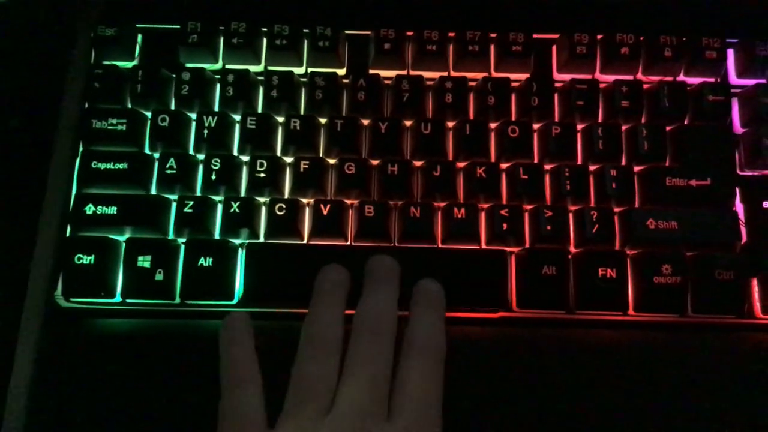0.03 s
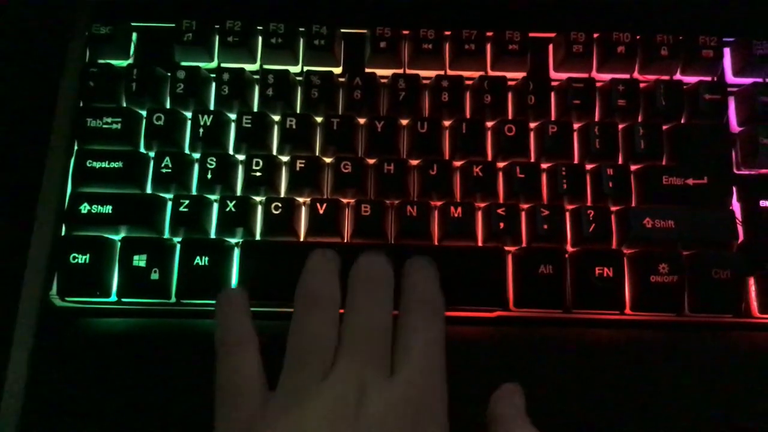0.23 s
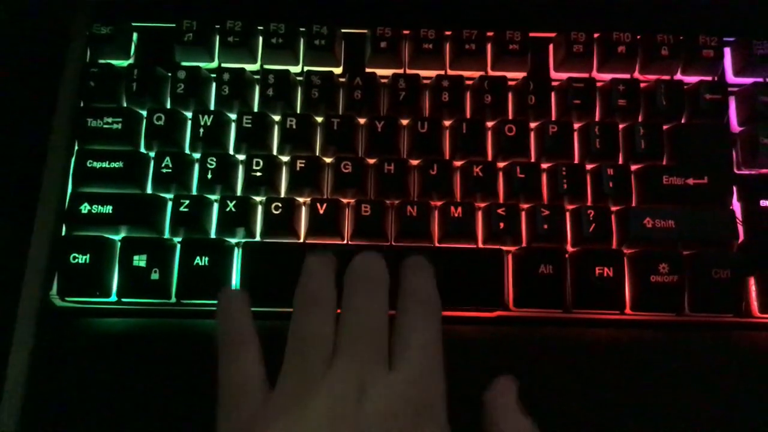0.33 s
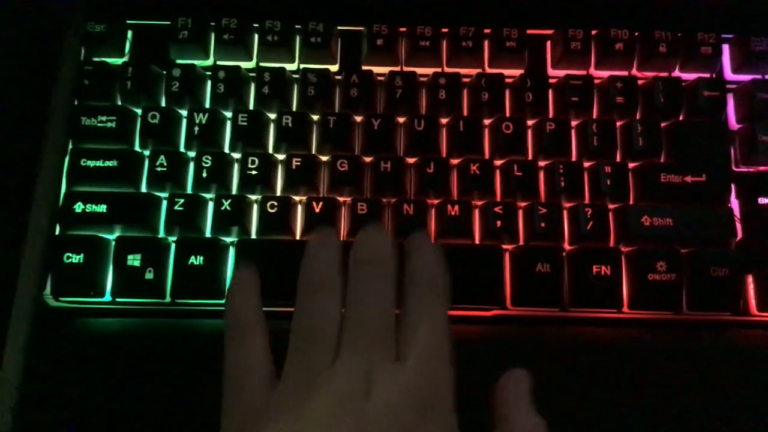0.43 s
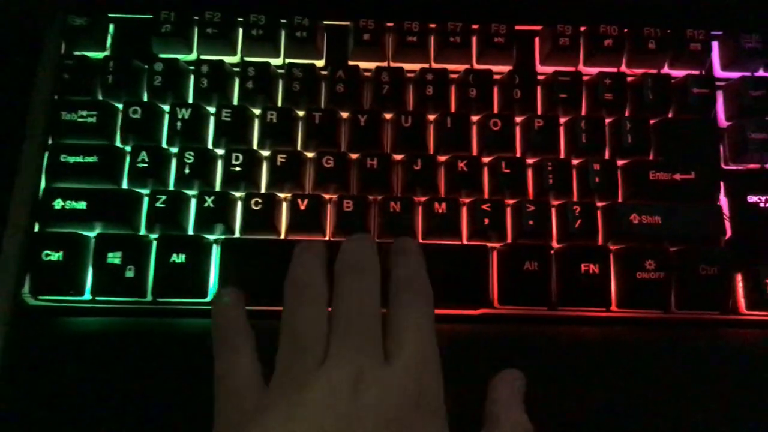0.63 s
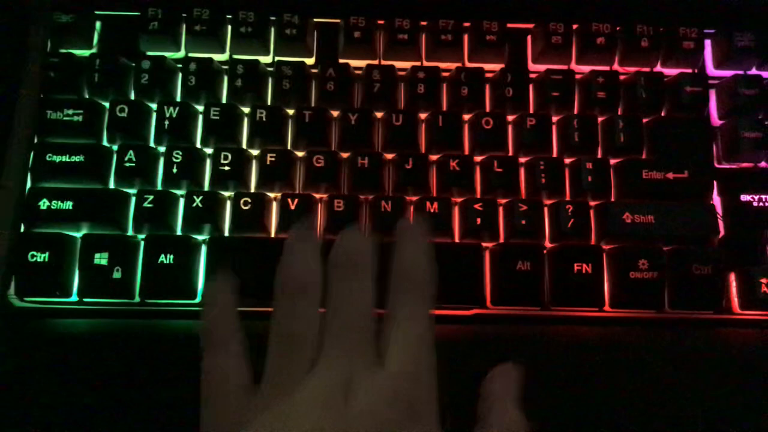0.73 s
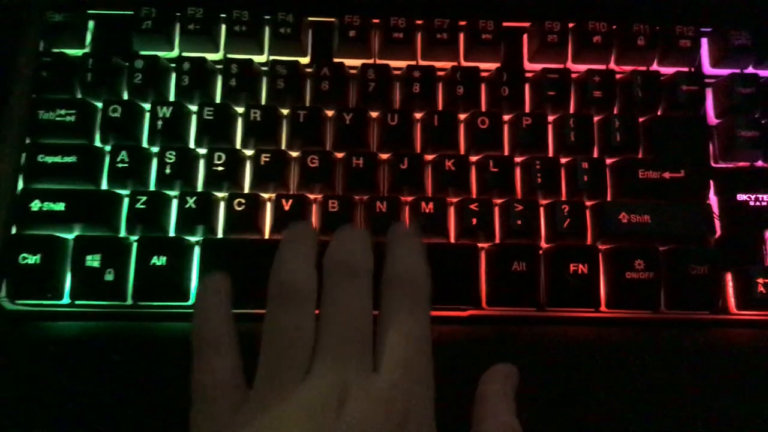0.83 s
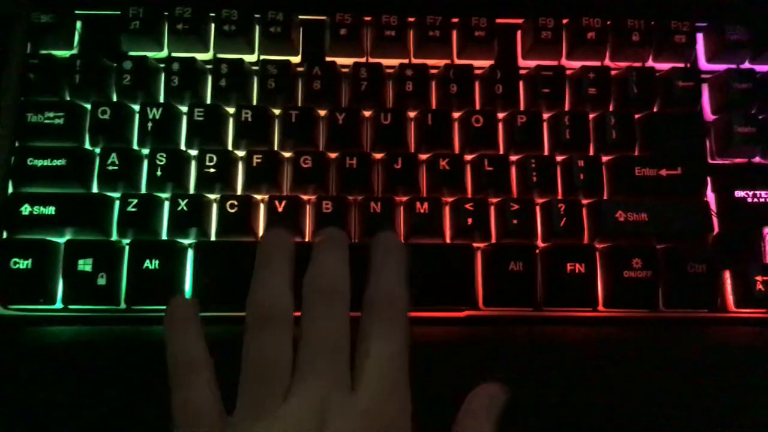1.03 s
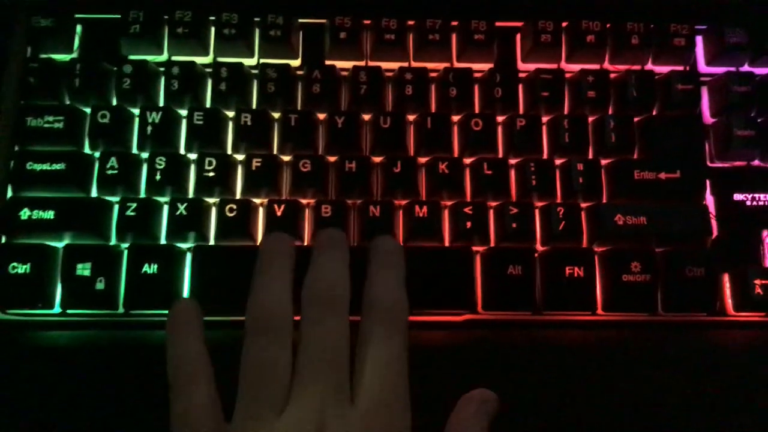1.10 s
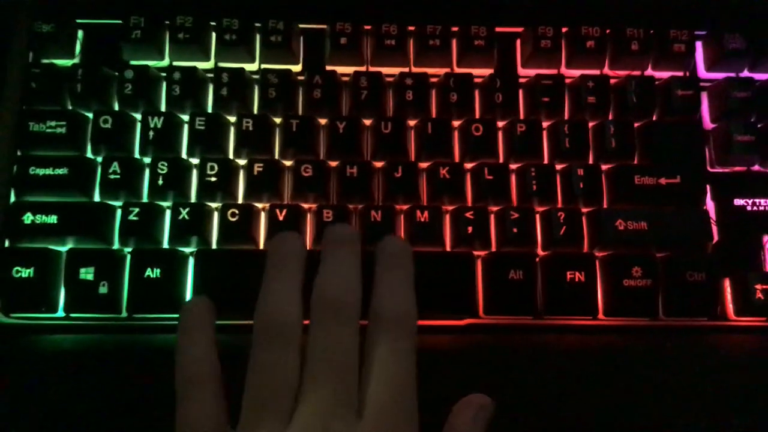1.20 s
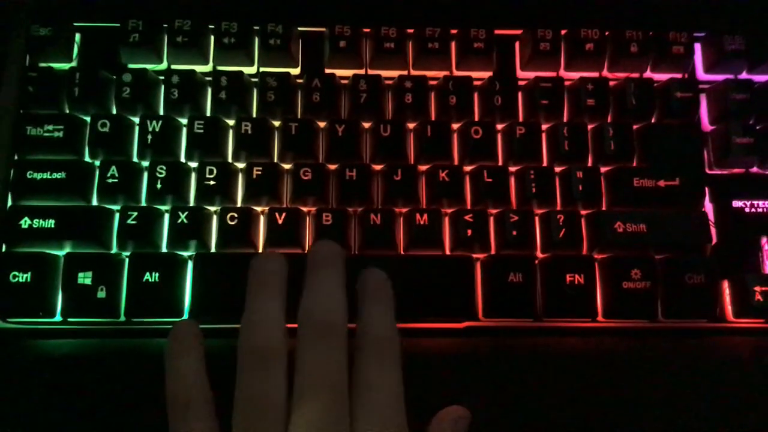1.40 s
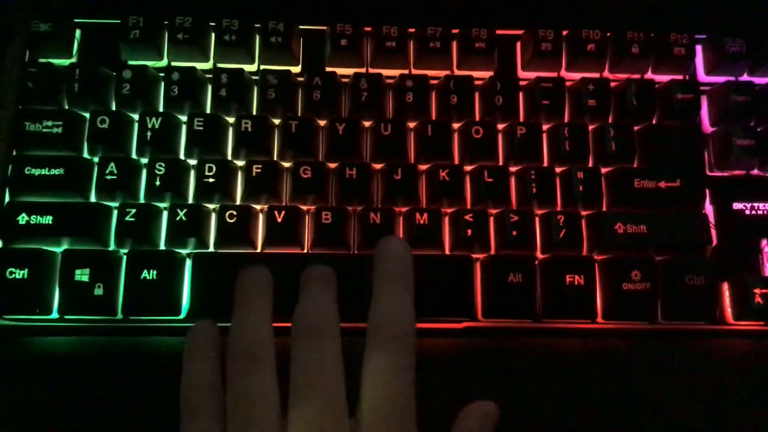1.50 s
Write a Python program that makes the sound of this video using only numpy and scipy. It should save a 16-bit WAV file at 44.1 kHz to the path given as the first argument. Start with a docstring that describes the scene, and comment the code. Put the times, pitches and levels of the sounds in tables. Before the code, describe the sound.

A keyboard space bar tapped about six times, giving sharp, rattling plastic clacks.

```python
"""Light fingernail ticks over a low fan hum lead into six taps of a plastic space bar on a desk.
Each press is an impact that excites damped modes: the keycap cracks, the case thumps, the bar rebounds.
On the way up the stabiliser wire rattles and the bar clacks against its top stop.
At the end the fingers settle on the bar. The small, quiet room adds a short diffuse tail."""
import sys
import numpy as np
from scipy import signal
from scipy.fft import rfft, irfft
from scipy.io import wavfile

SR = 44100
rng = np.random.default_rng(int(sys.argv[2]) if len(sys.argv) > 2 else 0)


def persist_wave(psi):
    """Save psi, clipped to +-1, as 16-bit WAV."""
    counts = np.round(np.clip(psi, -1, 1) * 32767).astype(np.int16)
    wavfile.write(sys.argv[1], SR, np.atleast_2d(counts).T)


N = 68355

# Fan noise and room air. Each row: frequency in Hz, relative spectral density in dB.
AIR_SPECTRUM = [(25, -111), (42, -25), (62, 3), (95, -4.5), (135, 2.5), (175, -4.5), (260, -6), (450, -13),
                (900, -23.5), (2000, -32.5), (5000, -38.5), (15000, -48)]
# Tones of the fan. Each row: frequency in Hz, level in dB.
HUM_TONES = [(119, -58), (211, -64)]
# The bass and treble parts of the room's tail. Each row: frequency in Hz, relative gain in dB.
BASS_TAIL_SPECTRUM = [(100, -7.5), (300, 5.5), (600, -3.5), (900, -6), (1600, -19), (5000, -37)]
TREBLE_TAIL_SPECTRUM = [(300, -15.5), (700, -5.5), (1300, -3), (4000, -1.5), (8000, -1), (15000, -2)]
# Dense modes of the plastic, by kind of contact. Each row: frequency in Hz, relative density in dB.
TICK_SPECTRUM = [(50, -37), (200, -17.5), (600, 2.5), (1300, 1), (2200, 0), (2850, 3.5), (3600, -3.5),
                 (4300, -6), (6000, -11.5), (16000, -26)]
STOP_SPECTRUM = [(50, -45), (200, -15), (450, -6), (720, 1), (950, 0.5), (1350, 5), (1650, 4), (2800, -5.5),
                 (3600, 0.5), (4700, -12), (6000, -16), (8500, -10), (11000, -10), (15000, -6.5)]
CLACK_SPECTRUM = [(50, -38), (200, -29), (500, 6), (800, -7.5), (1150, 7), (1600, -6.5), (1850, 3),
                  (2300, -8.5), (2900, -4), (3700, -12), (4400, -15), (5500, -13.5), (16000, -30.5)]
CLICK_SPECTRUM = [(100, -40), (1000, -28), (4000, 3), (5100, -3.5), (5900, -9), (7200, -1), (8700, 2),
                  (10500, -10), (12500, -10.5), (15500, -9.5), (17000, 2.5)]
# The pitched snap at the top stop. Each row: multiple of its pitch, relative density in dB.
SNAP_SPECTRUM = [(.2, -55), (.6, -19), (.82, -8), (.94, -5), (1.1, -1.5), (1.25, -12), (2, -45.5)]
# Modes of case and keycap. Each row: frequency in Hz, relative level in dB, 60 dB decay time in seconds.
CASE_MODES = [(216.3, -27, .12), (295, -23, 0.073), (359, -19.5, 0.067), (584, -6, 0.041),
              (653.8, -3, 0.036)]
CAP_MODES = [(1091, -0.5, 0.048), (1277, 2, 0.03), (1352, -12, 0.06), (1793, -2.5, 0.031),
             (2020, -29, 0.014), (2160, -11, 0.06), (4430, -8.5, 0.058)]
# Nails, loose cap and wire touch. Each row: start in seconds, body and treble levels in relative dB.
LIGHT_CONTACTS = [(0.0530, -18, -20), (0.0828, -5, -11.5), (0.0856, -7, 1), (0.1292, -12, -6.5),
                  (0.151, -13.5, -28), (0.1590, -22, -32), (0.2135, -24, -23), (0.229, -6.5, -29),
                  (0.2538, -9, -21), (0.281, -10.5, -6), (0.2890, -9, -12), (0.2965, -7.5, -30),
                  (0.3498, -15.5, -19), (0.4470, -2, 3), (0.4519, -3, -19), (0.4565, 6, -21),
                  (0.6036, -4.5, 3), (0.6085, 1.5, -5), (0.736, -13, -4), (0.7420, -3.5, -6),
                  (0.7470, -3.5, 3.5), (0.8868, -5, -1), (0.8935, -7, -16), (0.8979, -0.5, 2.5),
                  (1.0267, -11.5, -2), (1.0304, -5, -3), (1.0413, -9, -15), (1.0510, -25, -19),
                  (1.0564, -10, -9.5), (1.07, -24, -25), (1.0798, -13, -26), (1.1005, -20, -22),
                  (1.3636, -35, -20), (1.3666, -6, -0.5), (1.4408, -20, -29), (1.4696, -9.5, -13),
                  (1.4770, -24, -20), (1.5455, -11.5, -13.5)]
# The bar springs up. Each row: start in seconds, clack level in dB, snap pitch in Hz, snap level in dB,
# thump level in dB. Levels are relative.
UPSTROKES = [(0.3000, -17, 2730, -17, -32), (0.4602, -4, 2750, 0.5, -11.5), (0.6129, -4, 2450, -1.5, -13),
             (0.756, -2.5, 3650, 2, -23), (0.9013, -9.5, 3200, 0, -25)]
# The bar bottoms out. Each row: start in seconds, thump, clack and click levels in relative dB, cap pitch
# ratio (set by where the fingers land), rebound period in seconds, first rebound's level step in dB.
DOWNSTROKES = [(0.2311, -10.5, -15.5, -6, 1.02, 0.013, -5), (0.3636, -4, -6, -2, 0.87, 0.014, -9),
               (0.5147, -2, -2, -2, 0.98, .0143, -4.5), (0.665, -1, -2, 1, 1.0, 0.014, -7.5),
               (0.8060, 1.5, -1, -1, .99, .0143, -4), (0.9476, -2, -3.5, -3, 1.07, .0140, -5.5),
               (1.0715, -14.5, -22, -22, 1.06, .009, -33)]

AIR_DB, HUM_WAVER_DEPTH, HUM_WAVER_CORNER_HZ = -55, .7, 6.9
ROOM_RISE_S = 0.0059
BASS_TAIL_DB, BASS_TAIL_T60_S = -12.5, 0.15
TREBLE_TAIL_DB, TREBLE_TAIL_T60_S = -10.5, 0.31
TICK_DB, TICK_RISE_S, TICK_T60_S = -36, 0.00021, 0.036
TICK_TREBLE_DB, TICK_TREBLE_T60_S = -35.5, 0.021
STOP_DB, STOP_T60_S = -25, .02
SNAP_DB, SNAP_T60_S = -27.5, .012
CLACK_DB, CLACK_RISE_S, CLACK_T60_S = -24, 0.000633, 0.031
CLICK_DB, CLICK_RISE_S, CLICK_T60_S = -28, 0.00017, 0.036
VARIETY = 1.48  # how much the ring changes from blow to blow
REBOUND_EXPONENT = 1.63  # later rebounds die faster
TOUCH_LEAD_S, TOUCH_DB = 0.0016, -14.5  # the finger meets the cap just before the impact
CHATTER_S, CHATTER_DB = 0.024, -21  # the loose wire chatters for a moment after each press
LOW_CUT_HZ, HIGH_CUT_HZ = 26, 15950


def undb(db):
    """Decibels to amplitude ratio."""
    return 10 ** (np.asarray(db) / 20)


def unit(x):
    """Normalisation to an rms of 1."""
    return x / np.sqrt(np.mean(x ** 2))


def colour(x, points):
    """Minimum-phase filtering through (Hz, dB) points."""
    size = 2 * len(x)
    hz, db = np.array(points, float).T
    bin_hz = np.arange(len(x) + 1) * SR / size
    gain = undb(np.interp(np.log(bin_hz + 1), np.log(hz), db))
    cepstrum = irfft(np.log(gain))
    cepstrum[1:len(x)] *= 2  # folding the cepstrum makes the filter causal
    cepstrum[len(x) + 1:] = 0
    return irfft(rfft(x, size) * np.exp(rfft(cepstrum)))[:len(x)]


def clock(size=8192):
    """Time axis in seconds."""
    return np.arange(size) / SR


def fade(t, rise_s, t60_s):
    """Envelope of a damped vibration: quick rise, exponential decay."""
    return (1 - np.exp(-(t / rise_s) ** 2)) * np.exp(-np.log(1000) * t / t60_s)


def add(out, start_s, sound):
    """Superposition of a sound at its start time."""
    i = int(np.clip(start_s * SR, 0, N - 1))
    out[i:i + len(sound)] += sound[:N - i]


def fan():
    """Broadband air noise lies under tones whose amplitude is randomly modulated."""
    t, hum = clock(N), 0
    for hz, db in HUM_TONES:
        waver = unit(colour(rng.standard_normal(N), [(HUM_WAVER_CORNER_HZ, 0),
                                                     (10 * HUM_WAVER_CORNER_HZ, -60)]))
        tone = np.sin(2 * np.pi * (hz * t + rng.random()))
        hum += undb(db) * unit((1 + HUM_WAVER_DEPTH * waver) * tone)
    return hum + undb(AIR_DB) * unit(colour(rng.standard_normal(N), AIR_SPECTRUM))


def diffuse_tail(level_db, t60_s, spectrum):
    """Many overlapping reflections form exponentially decaying noise."""
    noise = rng.standard_normal(N) * fade(clock(N), ROOM_RISE_S, t60_s)
    return undb(level_db) * colour(noise / np.sqrt(np.sum(noise ** 2)), spectrum)


def room(direct):
    """Reverberation: the direct sound is joined by its convolution with the room's response."""
    bass = diffuse_tail(BASS_TAIL_DB, BASS_TAIL_T60_S, BASS_TAIL_SPECTRUM)
    treble = diffuse_tail(TREBLE_TAIL_DB, TREBLE_TAIL_T60_S, TREBLE_TAIL_SPECTRUM)
    return direct + signal.fftconvolve(direct, bass + treble)[:N]


def resonator(blows, modes, rise_s, level_db):
    """Modal superposition: each blow (s, dB) excites a sum of damped sinusoids."""
    t, out = clock(), np.zeros(N)
    ring = sum(undb(db) * fade(t, rise_s, t60) * np.sin(2 * np.pi * hz * (t - rise_s))
               for hz, db, t60 in modes)
    for start, db in blows:
        add(out, start, undb(db + level_db) * ring)
    return out


def plastic(blows, spectrum, rise_s, t60_s):
    """Modal overlap: each blow (s, dB) rings as a noise burst, partly the same every time."""
    t, out = clock(), np.zeros(N)
    envelope = fade(t, rise_s, t60_s)
    shared = rng.standard_normal(len(t))
    for start, db in blows:
        noise = shared + VARIETY * rng.standard_normal(len(t))
        ring = unit(colour(envelope * noise, spectrum))
        add(out, start, undb(db) * ring * np.sqrt(np.mean(envelope ** 2)))
    return out


def case(blows):
    """Low resonances of the case on the desk build up over milliseconds into a hollow thump."""
    return resonator(blows, CASE_MODES, rise_s=0.00315, level_db=-13.5)


def ticks():
    """Light impacts of nails, cap and wire excite the plastic; the treble is damped sooner."""
    body = [(start, db) for start, db, _ in LIGHT_CONTACTS]
    treble = [(start, db) for start, _, db in LIGHT_CONTACTS]
    return (undb(TICK_DB) * plastic(body, TICK_SPECTRUM, TICK_RISE_S, TICK_T60_S)
            + undb(TICK_TREBLE_DB) * plastic(treble, CLICK_SPECTRUM, TICK_RISE_S, TICK_TREBLE_T60_S))


def releases():
    """Impact on the top stop: a bright clack, a heavily damped pitched snap and a weak thump."""
    clacks = [(start, db) for start, db, *_ in UPSTROKES]
    stop = plastic(clacks, STOP_SPECTRUM, TICK_RISE_S, STOP_T60_S)
    snap, thumps = 0, []
    for start, _, snap_hz, snap_db, thump_db in UPSTROKES:
        spectrum = [(snap_hz * ratio, db) for ratio, db in SNAP_SPECTRUM]
        snap += plastic([(start, snap_db)], spectrum, TICK_RISE_S, SNAP_T60_S)
        thumps.append((start, thump_db))
    return undb(STOP_DB) * stop + undb(SNAP_DB) * snap + case(thumps)


def bounce(start, db, period, drop_db, dull_db=0):
    """Inelastic collisions: a blow and three ever weaker rebounds, as rows (s, dB)."""
    rebounds = [(start + k * period, db + dull_db + drop_db * k ** REBOUND_EXPONENT) for k in (1, 2, 3)]
    return [(start, db)] + rebounds


def presses():
    """Impact excitation: the bar hits bottom, rings case and cap, and rebounds with a duller sound."""
    cap, thumps, clacks, clicks, chatter = 0, [], [], [], []
    for start, thump_db, clack_db, click_db, pitch, period, drop_db in DOWNSTROKES:
        cap_modes = [(hz * pitch, db, t60) for hz, db, t60 in CAP_MODES]
        cap += resonator([(start, clack_db)], cap_modes, CLACK_RISE_S, level_db=-30)
        thumps += bounce(start, thump_db, period, drop_db)
        clacks += bounce(start, clack_db, period, drop_db, dull_db=-2)
        clicks += bounce(start, click_db, period, drop_db, dull_db=-3)
        clicks.append((start - TOUCH_LEAD_S, click_db + TOUCH_DB))
        chatter += [(start + period / 2 + lag, click_db + CHATTER_DB) for lag in CHATTER_S * rng.random(6)]
    clack = undb(CLACK_DB) * plastic(clacks, CLACK_SPECTRUM, CLACK_RISE_S, CLACK_T60_S)
    click = undb(CLICK_DB) * plastic(clicks, CLICK_SPECTRUM, CLICK_RISE_S, CLICK_T60_S)
    wire = undb(CLACK_DB) * plastic(chatter, TICK_SPECTRUM, TICK_RISE_S, TICK_T60_S)
    return case(thumps) + cap + clack + click + wire


def scene():
    """The fan and the reverberant space bar superpose in one channel."""
    return (fan() + room(presses() + releases() + ticks()))[None]


def record(dry):
    """Band limiting removes the deep bass and the highest treble."""
    low_cut = signal.butter(2, LOW_CUT_HZ, "highpass", fs=SR, output="sos")
    high_cut = signal.ellip(10, .2, 70, HIGH_CUT_HZ, fs=SR, output="sos")
    return signal.sosfilt(high_cut, signal.sosfilt(low_cut, dry))


dry = scene()
out = record(dry)
persist_wave(out)
```